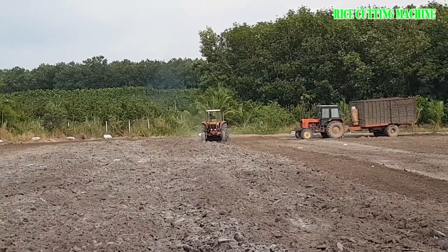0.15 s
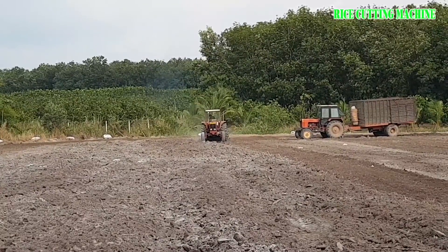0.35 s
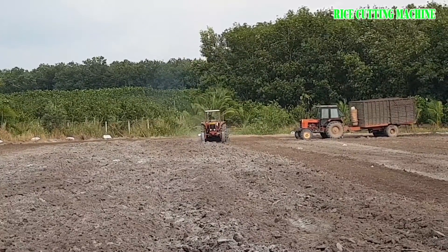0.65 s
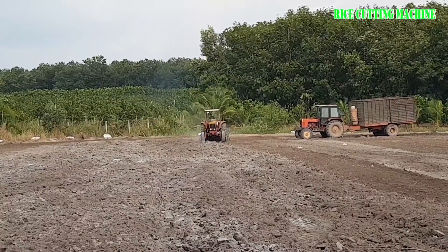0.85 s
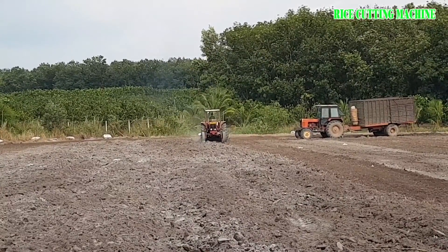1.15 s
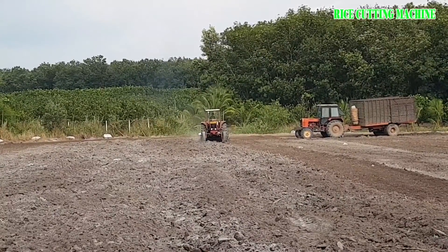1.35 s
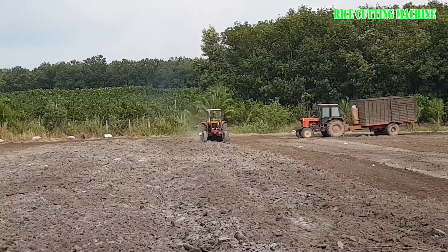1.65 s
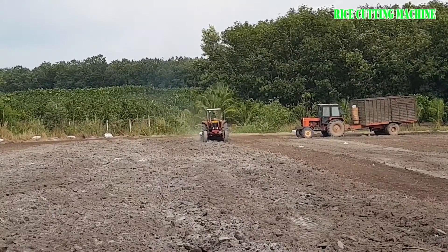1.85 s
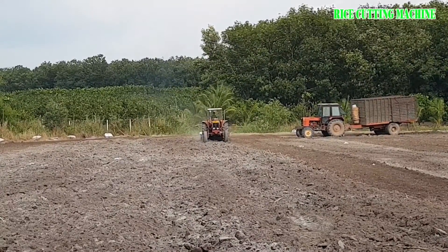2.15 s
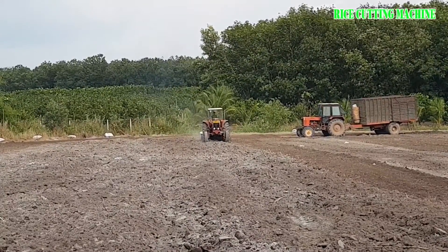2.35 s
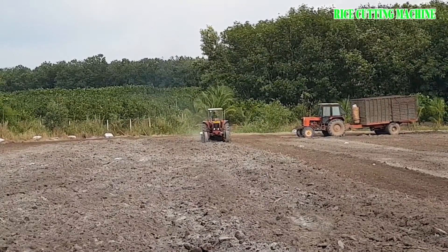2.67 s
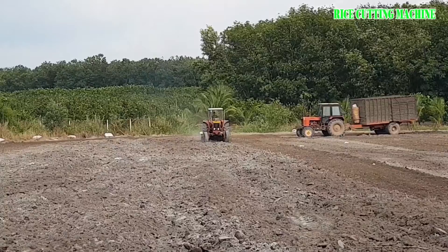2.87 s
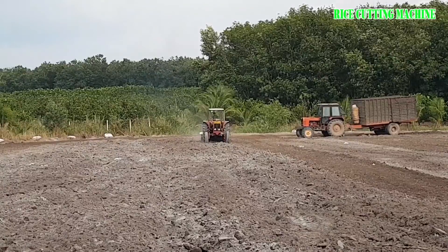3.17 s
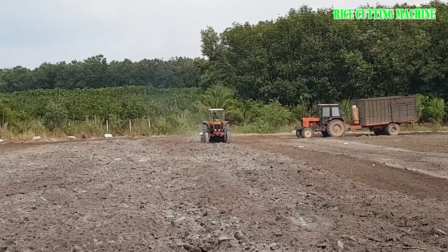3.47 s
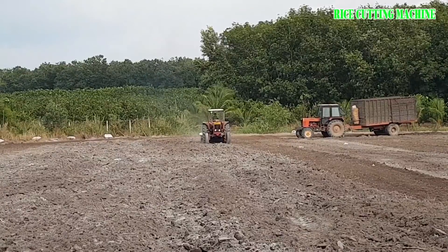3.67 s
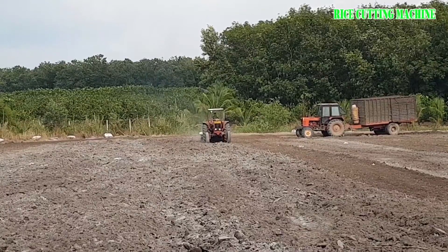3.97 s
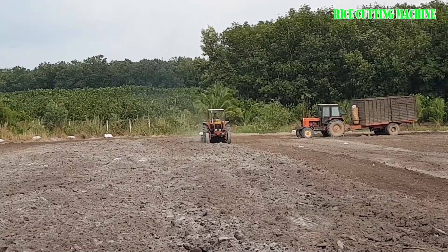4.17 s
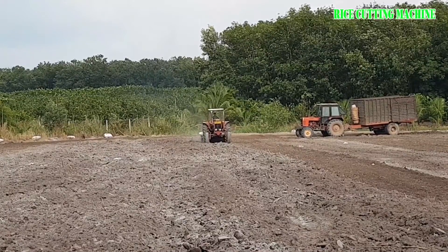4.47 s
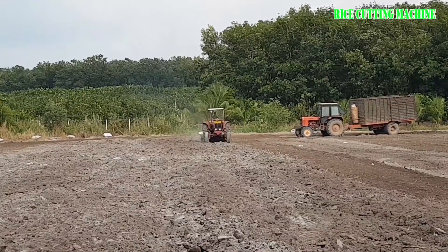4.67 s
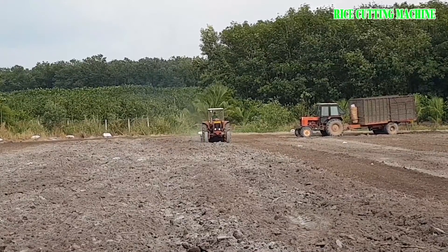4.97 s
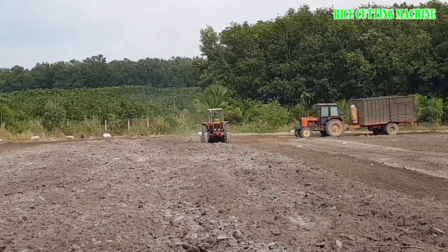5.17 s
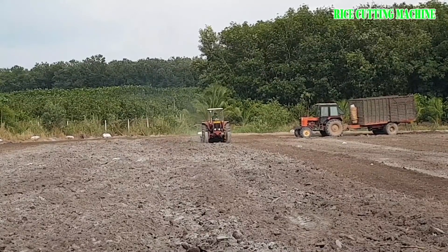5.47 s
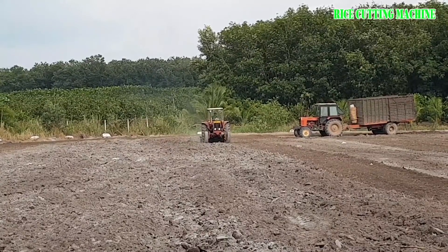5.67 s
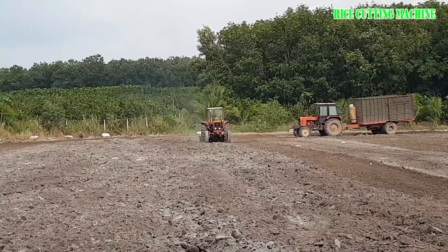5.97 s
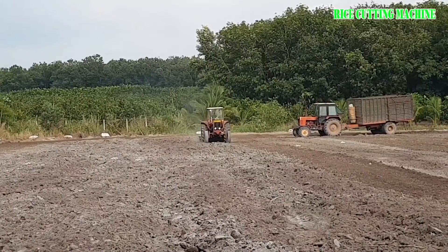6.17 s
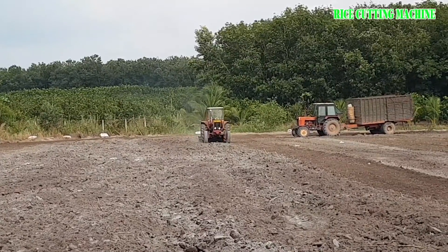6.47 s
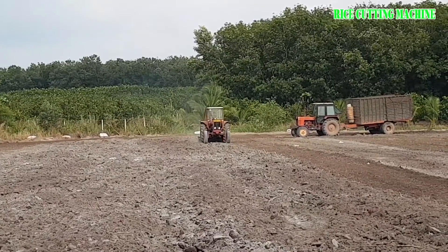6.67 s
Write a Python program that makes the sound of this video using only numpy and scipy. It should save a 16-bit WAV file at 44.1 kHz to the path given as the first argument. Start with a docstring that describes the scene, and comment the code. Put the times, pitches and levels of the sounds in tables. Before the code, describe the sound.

A tractor diesel runs throughout about seven seconds, some distance away and roughly central: a low, fast throb near 55 pulses a second with a hollow pipe-like exhaust ring and muted knocking. At first the treble is subdued; rasp and hiss rise from about 0.7, are strong near 2.4, and fade around 3 to 4. Close on the right, a dog gives short barks at about 0.05, 0.65, 1.3 and 2.1 seconds, each starting pitched and breaking into hoarse flutter, with a soft diffuse tree echo. Between 3.5 and 4.7 the engine tone beats in quickening swells. A fifth bark at 4.5 is higher, breathier and hoarse throughout. From 5 onward the engine grows fuller and raspier, continuing unbroken to the end. Faint dull air puffs and a quiet field-and-foliage wash lie underneath; the outdoor space is open.

```python
"""Tractor and barking dog

A four-cylinder diesel tractor tills a field some way off. Each firing adds a pressure pulse to the throb
and a burst of turbulence that rings in the exhaust stack; moving air lets the rasp swell and fade.
Near by on the right a dog barks five times: pitched folds, clear at first in four barks, break into
flutter and hoarse air, and the tree line scatters a soft answer. Faint noise puffs and a steady
noise wash of field and foliage lie beneath."""
import sys
import numpy as np
from scipy import signal
from scipy.fft import rfft, irfft, next_fast_len
from scipy.io import wavfile
from scipy.ndimage import uniform_filter1d, map_coordinates

SR = 44100
rng = np.random.default_rng(int(sys.argv[2]) if len(sys.argv) > 2 else 0)


def unload_audio(sound):
    """Save the sound as a 16-bit wav file, at the path given as the first command line argument."""
    columns = np.transpose(np.atleast_2d(sound))
    # keep every value between -1 and 1, then stretch to whole-number steps
    steps = np.round(np.clip(columns, -1, 1) * 32767)
    wavfile.write(sys.argv[1], SR, steps.astype(np.int16))


N = 300762

# Engine speed: (time [s], firing rate [1/s])
FIRING_RATE = [(0.0, 55.56), (0.7, 55.48), (1.2, 54.91), (1.8, 54.92), (2.25, 53.07), (2.6, 54.58),
               (2.9, 56.11), (3.2, 54.48), (3.7, 54.68), (4.2, 54.15), (4.7, 54.01), (5.2, 54.69),
               (5.6, 53.92), (6.0, 55.11), (6.4, 54.12), (6.82, 54.93)]
# Engine load, read as firing-tone strength: (time [s], relative load [dB])
ENGINE_LOAD = [(0.1, -41.5), (0.26, -38.5), (2.65, -35.5), (3.02, -38.5), (5.6, -32.5), (6.7, -33)]
USUAL_LOAD_DB = -36
# Layers driven by load: (level at usual load [dB], slope [dB per dB of load])
TONE_LAW, PIPE_LAW = (-36.5, 1.03), (-48.5, 0.65)
# Octave of the firing tone: (time [s], relative level [dB])
OCTAVE_CURVE = [(0.15, -43), (0.28, -45), (2.45, -35), (2.52, -40), (3.72, -40), (4.0, -44), (4.36, -37),
                (6.52, -37), (6.7, -36)]
# Firing-tone beating: (start [s], end [s], beat rate at start [Hz], greatest depth [0-1])
TONE_BEATING = (3.52, 4.73, 3.29, 0.67)
BEAT_SPEEDUP_HZ_PER_S = 1.2
# Rumble between the firing tones: (time [s], relative level [dB])
RUMBLE_CURVE = [(0.0, -47), (0.42, -44), (1.12, -52.5), (2.01, -39), (3.57, -42.5), (3.7, -52), (4.6, -48),
                (4.62, -43.5), (4.94, -44.5), (5.01, -35), (5.17, -40.5), (6.23, -39.5), (6.78, -40),
                (6.82, -53)]
# Rasp and sizzle as the air carries them: (time [s], relative rasp [dB], relative sizzle [dB])
AIR_CARRY = [(0.02, -59.5, -68), (0.38, -60, -69), (0.68, -51, -56.5), (0.94, -53, -51.5),
             (2.37, -43, -43.5), (2.54, -45.5, -44), (2.79, -51.5, -54), (3.07, -57, -59),
             (3.35, -60.5, -50.5), (4.05, -62.5, -56), (4.58, -48, -56.5), (4.95, -54.5, -57.5),
             (5.29, -49.5, -47.5), (5.74, -45.5, -46), (6.14, -47, -45), (6.78, -42.5, -47)]
# Finest hiss: (time [s], relative level [dB])
HISS_CURVE = [(0.02, -66.5), (0.47, -64), (1.07, -54), (1.2, -49), (1.62, -56.5), (1.9, -56.5),
              (2.11, -52.5), (2.54, -51), (2.84, -61.5), (3.13, -60), (4.56, -56.5), (4.9, -58),
              (5.48, -53), (5.71, -47), (5.95, -53), (6.16, -51), (6.42, -49.5), (6.78, -49.5)]
OCTAVE_TRIM_DB, RUMBLE_TRIM_DB = -1, 3.0
RASP_TRIM_DB, SIZZLE_TRIM_DB, HISS_TRIM_DB = 1.5, 2.5, 5.6
# Engine noise colours, low to high: (frequency [Hz], relative response [dB])
RUMBLE_COLOUR = [(25, -20), (42, -27), (55, -3.5), (78, 2.5), (100, -9), (135, -10), (180, -18.5),
                 (240, -34), (400, -34.5), (700, -50)]
PIPE_COLOUR = [(150, -19), (290, -3.5), (400, -12.5), (520, 6.5), (610, -1), (740, 5.5), (860, -12.5),
               (1020, 7.5), (1200, 5.5), (1350, 0), (1700, 0), (2100, 0), (2800, -86), (5000, -38)]
RASP_COLOUR = [(1000, -15.5), (1500, -6), (1900, -2.5), (2430, 1.5), (2680, -4.5), (2900, 1.5), (3300, -10),
               (4500, -42)]
SIZZLE_COLOUR = [(2200, -10.5), (2900, 0.5), (3350, -2), (3650, 1.5), (4200, -4.5), (5000, -10.5),
                 (7000, -32)]
HISS_COLOUR = [(2530, -15), (4300, -6.5), (4810, -14), (5450, -5.5), (6300, 1), (7090, -3.5), (8660, -5),
               (9230, -7.5), (10600, -3.5), (14200, -12), (15100, -24), (15600, -31)]
KNOCK_COLOUR = [(350, -61), (520, -6.5), (700, -7.0), (900, -44.5)]
# Reflection in the stack: (frequency [Hz], share of the nominal reflection [0-1])
STACK_REFLECTION = [(500, 0.091), (2400, 0.72), (4000, 1.0), (9000, 0.4)]
# Engine stereo balance: (frequency [Hz], left minus right [dB])
ENGINE_BALANCE = [(60, 0), (200, -1.3), (700, -0.5), (1300, -1), (2300, -0.5), (4000, -3.5), (8000, -.7),
                  (12000, -2)]
# Barks: (start [s], nominal length [s], relative level [dB], mean top pitch [Hz],
#         clear share of length [0-1], mouth brightness [dB], hoarseness [about 0-1])
BARK_LIST = [(0.049, 0.14, -19.5, 302.8, 0.32, 1, 0.63), (0.648, 0.13, -19.5, 305.7, 0.65, -0.5, 0.68),
             (1.311, 0.15, -21, 299.8, 0.22, 0.5, 0.72), (2.089, .148, -18.5, 293.5, 0.33, 0.5, 0.65),
             (4.493, 0.14, -20, 340.8, 0, 3, 1.04)]
# Dog's throat before pitch and hoarseness reshape it: (frequency [Hz], relative response [dB])
THROAT_COLOUR = [(120, -34), (270, -12), (370, -20.5), (470, 1.5), (600, 2), (720, -2.5), (840, -10.5),
                 (1010, -1), (1350, -13), (1540, -4.5), (1820, -31.5), (2900, -40), (4500, -43.5),
                 (14000, -55)]
# Open mouth: (frequency [Hz], multiplier of mouth brightness [dB/dB])
OPEN_MOUTH = [(480, -1.04), (600, 0.37), (730, 2.0), (1150, 1.2), (1650, 0.1), (2200, 0.66), (3000, 0.33)]
# Shut mouth: (frequency [Hz], response [dB])
SHUT_MOUTH = [(600, 3.5), (1100, 1.0), (2000, -23)]
JAW_SHUT_SHARE = 1.09  # of nominal bark length
# Air between dog and listener: (frequency [Hz], response [dB])
AIR_RESPONSE = [(3500, -2), (7000, -4), (14000, -14)]
# Bark pitch arch: (top position [share of length], rise, fall [shares of top pitch])
PITCH_ARCH = (.34, .2, .22)
LEAD_IN_DB, LEAD_IN_S, ATTACK_S = -13, .015, .011
SAG_DB_PER_S, RELEASE_SHARE, RELEASE_DB_PER_S = 29.5, 0.79, 335
# Tree-line echo: (frequency [Hz], time to decay 60 dB [s])
TREE_DECAY = [(200, 0.27), (550, 0.26), (1100, 0.23), (2000, 0.34), (8000, 0.03)]
# Faint dull puffs: (centre time [s], half-width to 1/e [s], level [dB],
#                    centre frequency [Hz], Gaussian width [octaves])
PUFF_LIST = [(1.1, .05, -43, 825, 0.57), (2.02, 0.035, -41, 127, 0.25), (2.42, 0.032, -36.5, 125, 0.15),
             (2.727, 0.13, -48, 293, 0.73), (5.086, 0.026, -50, 184.3, 0.27)]
# Field and foliage wash: (frequency [Hz], relative density [dB per Hz])
FIELD_COLOUR = [(150, 5.5), (400, -1), (1200, -7), (2500, -4), (5000, -3), (8000, -9), (12000, -18),
                (15500, -32)]
# Stereo: (frequency [Hz], left-right correlation)
STEREO_LIKENESS = [(60, 0.92), (130, 0.97), (290, 0.85), (640, 0.59), (1400, 0.64), (3100, 0.61),
                   (6000, 0.12), (15000, 0.2)]
TOP_HZ = 15600


def tractor():
    """Exhaust pulses give a deep throb and gas bursts, stronger under load; one cylinder in four knocks."""
    rate_hz, = curves(FIRING_RATE)
    load_db = curves(ENGINE_LOAD)[0] - USUAL_LOAD_DB
    rasp_db, sizzle_db = curves(AIR_CARRY)
    hiss_db, = curves(HISS_CURVE)
    firings = np.cumsum(rate_hz) / SR + .35
    pipe_gain = follows(PIPE_LAW, load_db)

    pipe = pipe_gain * gas(firings, PIPE_COLOUR, decay=0.29, steady=0.65, scatter_db=2.34, repeat=0.71)
    rasp = gas(firings, RASP_COLOUR, decay=0.31, steady=0.42, scatter_db=2.0, repeat=0.54)
    sizzle = gas(firings, SIZZLE_COLOUR, decay=0.31, steady=0.37, scatter_db=1.43, repeat=0.47)
    hiss = gas(firings, HISS_COLOUR, decay=0.22, steady=0.58, scatter_db=1.6, repeat=0.52)
    rasp = amp(rasp_db + RASP_TRIM_DB) * rasp
    sizzle = amp(sizzle_db + SIZZLE_TRIM_DB) * sizzle
    hiss = amp(hiss_db + HISS_TRIM_DB + 0.6 * wobble(8)) * hiss

    engine = throb(firings, load_db) + rumble() + pipe + rasp + sizzle + hiss
    engine = engine + pipe_gain * knock(firings)
    halves = np.array([[.5], [-.5]])
    return filtered(engine, lambda hz: amp(along(ENGINE_BALANCE, hz) * halves))


def throb(firings, load_db):
    """Periodic exhaust pressure: firing tone and overtones, dipping just before each valve opens."""
    octave_db, = curves(OCTAVE_CURVE)
    angle = 2 * np.pi * (firings - .915 + .012 * wobble(40))
    tone = follows(TONE_LAW, load_db) * beating() * amp(1.0 * wobble(12)) * np.cos(angle)
    overtones = np.cos(2 * angle) + 0.051 * np.cos(3 * angle)
    octave = amp(octave_db + OCTAVE_TRIM_DB) * amp(0.91 * wobble(14)) * overtones
    return -np.sqrt(2) * (tone + octave)


def beating():
    """Gain of the firing tone: it swells and dips ever faster for about a second."""
    start_s, end_s, rate_hz, depth = TONE_BEATING
    t = np.arange(N) / SR - start_s
    beats = rate_hz * t + .5 * BEAT_SPEEDUP_HZ_PER_S * t ** 2
    extent = np.sqrt(np.abs(np.sin(np.pi * np.clip(t / (end_s - start_s), 0, 1))))
    return 1 - depth * extent * np.cos(2 * np.pi * beats)


def follows(law, change_db):
    """Gain of a layer that follows a control by a (dB, dB per dB) law."""
    return amp(law[0] + law[1] * change_db)


def rumble():
    """Low random noise between the firing tones."""
    level_db, = curves(RUMBLE_CURVE)
    return amp(level_db + RUMBLE_TRIM_DB) * coloured(spread(rng.standard_normal((2, N))), RUMBLE_COLOUR)


def gas(firings, spectrum, decay, steady, scatter_db, repeat):
    """A burst of turbulence at each firing over a steady rush; part of it rings alike every time."""
    since = firings % 1  # decay is in these firing periods
    stroke = np.floor(firings).astype(int)
    cylinder_db = np.array([0, -.6, .2, .5])[stroke % 4]
    scatter = rng.standard_normal(stroke[-1] + 1)[stroke]
    size = amp(scatter_db * scatter + cylinder_db)
    burst = unit(size * (1 - np.exp(-(since / 0.13) ** 2)) * np.exp(-since / decay))
    # the same noise snippet restarts at every firing
    ring = rng.standard_normal((2, SR))[:, (since * SR / 54.6).astype(int)]
    noise = rng.standard_normal((2, N)) + repeat * ring
    rush = steady * rng.standard_normal((2, N))
    return coloured(filtered(spread(noise * burst + rush), stack), spectrum)


def stack(hz, resonance_hz=242.1, reflect=0.35):
    """Sound runs up and down the exhaust stack and leaves evenly spaced resonances."""
    kept = reflect * along(STACK_REFLECTION, hz)
    return 1 / (1 - kept * np.exp(-2j * np.pi * hz / resonance_hz))


def knock(firings):
    """One cylinder's short noise blow, once every four firings."""
    cycle = (firings + 1) % 4 - 1
    blow = np.exp(-((cycle - .14) / 0.18) ** 2) * rng.standard_normal(N)
    return amp(-10.0) * coloured(blow, KNOCK_COLOUR)


def dog():
    """Barks from the right reach the left side later and weaker."""
    pair = np.zeros((2, N + SR))
    for start_s, length_s, db, pitch_hz, clear, mouth_db, hoarse in BARK_LIST:
        call = amp(db) * bark(length_s, pitch_hz, clear, mouth_db, hoarse)
        answer = amp(-10.5) * spread(trees(call))
        start = round(start_s * SR)
        pair[:, start:start + len(call)] += call
        pair[:, start:start + answer.shape[1]] += answer
    lag_s = 17.5 / SR
    sides = np.array([[-1], [1]])  # half the lag each way
    pair = filtered(pair[:, :N], lambda hz: np.exp(1j * np.pi * hz * lag_s * sides))
    return pair * amp([[.3], [2.9]])


def bark(length_s, pitch_hz, clear, mouth_db, hoarse):
    """The vocal folds flutter irregularly once the clear share ends and let hoarse air through."""
    size = SR // 3
    t = np.arange(size) / SR
    u = t / length_s
    # hoarsest under full pressure, smoother again as the pressure falls
    rough = hoarse * np.interp(u, [clear - .06, clear + .06, .75, 1], [.3, 1, .95, .55])
    pitch = pitch_hz * arch(u) * (1 + .075 * rough * wobble(261.1, size))
    angle = 2 * np.pi * np.cumsum(pitch) / SR
    # a higher bark tightens the throat; leaking air damps its resonances
    throat = np.array(THROAT_COLOUR) * [(pitch_hz / 300) ** .35, 1.4 - 0.65 * hoarse]

    # the even partials dominate while the folds run clear
    order = np.arange(1, 25)[:, None]
    partial_gain = np.where(order % 2, amp(-6 * (1.5 - rough)), 1)
    folds = np.sum(np.cos(order * angle) * partial_gain, axis=0)
    folds = coloured(folds * amp(4.6 * rough * wobble(196, size)), throat)
    air = coloured(rng.standard_normal(size) * (1 + .5 * np.cos(angle)), throat)
    voice = (1 - .55 * rough) * folds + .8 * rough * air

    # the jaw opens and shuts once, letting the upper resonances out in mid-bark
    jaw = np.sin(np.pi * np.clip(u / JAW_SHUT_SHARE, 0, 1))
    bright = filtered(voice, lambda hz: amp(mouth_db * along(OPEN_MOUTH, hz)))
    dull = filtered(voice, lambda hz: amp(along(SHUT_MOUTH, hz)))
    voice = filtered(jaw * bright + (1 - jaw) * dull, lambda hz: amp(along(AIR_RESPONSE, hz)))
    # steady lung pressure holds the loudness even through the flutter
    voice = voice / np.sqrt(np.abs(uniform_filter1d(voice ** 2, size=700)) + 1e-9)
    return voice * effort(t, length_s)


def arch(u):
    """Pitch ratio along a bark: it rises with the lung pressure and falls with it."""
    top, rise, fall = PITCH_ARCH
    before = rise * (1 - u / top) ** 2
    after = fall * np.clip((u - top) / (1 - top), 0, 1) ** 1.595
    return 1 - np.where(u < top, before, after)


def effort(t, length_s):
    """Gain along a bark: soft lead-in, attack, sagging hold, release."""
    attack_db = LEAD_IN_DB * (1 - np.clip((t - LEAD_IN_S) / ATTACK_S, 0, 1))
    release_db = RELEASE_DB_PER_S * np.maximum(t - RELEASE_SHARE * length_s, 0)
    return amp(attack_db - SAG_DB_PER_S * t - release_db) * np.clip(t / 0.006, 0, 1)


def trees(x):
    """The tree line scatters a sound back as decaying noise, the highest treble dying first."""
    hz, t, z = signal.stft(rng.standard_normal((2, SR // 2)), SR, nperseg=256)
    decay = amp(-60 * t / along(TREE_DECAY, hz)[:, None])
    onset = 1 - np.exp(-t / 0.008)
    tail = signal.istft(z * decay * onset, SR, nperseg=256)[1]
    return signal.fftconvolve(x[None], tail / np.linalg.norm(tail[0]), axes=1)


def puffs():
    """A few faint, dull swells of band-limited noise."""
    t = np.arange(SR) / SR - .5
    out = np.zeros(N + SR)
    for centre_s, width_s, db, centre_hz, octaves in PUFF_LIST:
        def band(hz):
            return np.exp(-.5 * (np.log2((hz + 1) / centre_hz) / octaves) ** 2)
        noise = unit(filtered(rng.standard_normal(SR), band))
        out[round((centre_s - .5) * SR):][:SR] += amp(db) * noise * np.exp(-(t / width_s) ** 2)
    return out[:N]


def field():
    """A soft, even noise wash of foliage and far noise."""
    return amp(-50.5) * coloured(spread(rng.standard_normal((2, N))), FIELD_COLOUR)


def amp(db):
    """Decibels to gain."""
    return 10 ** (np.asarray(db) / 20)


def unit(x):
    """Scaled to rms 1."""
    return x / np.sqrt(np.mean(x ** 2) + 1e-20)


def along(points, hz):
    """(Hz, value) points interpolated on a log frequency axis."""
    f, v = np.transpose(points)
    return np.interp(np.log(hz + 1), np.log(f + 1), v)


def curves(rows):
    """One value per sample for each column after the time."""
    s, *cols = np.transpose(rows)
    return [np.interp(np.arange(N) / SR, s, c) for c in cols]


def wobble(rate_hz, size=N):
    """A smooth random curve, rate_hz knots a second."""
    knots = rng.standard_normal(int(size * rate_hz / SR) + 4)
    return map_coordinates(knots, [np.arange(size) * rate_hz / SR])


def filtered(x, response):
    """x times a complex response of frequency."""
    n = x.shape[-1]
    m = next_fast_len(n + 8192)
    return irfft(rfft(x, m) * response(np.fft.rfftfreq(m, 1 / SR)), m)[..., :n]


def coloured(x, spectrum):
    """x through a (Hz, dB) spectrum, at rms 1."""
    return unit(filtered(x, lambda hz: amp(along(spectrum, hz))))


def spread(pair):
    """Two unrelated signals become left and right: alike in the bass, apart in the treble."""
    def shares(hz):
        alike = np.clip(along(STEREO_LIKENESS, hz), -1, 1)
        return np.sqrt(np.array([1 + alike, 1 - alike]) / 2)
    mid, side = filtered(pair, shares)
    return np.array([mid + side, mid - side])


def scene():
    """Tractor and dog in the open field."""
    return tractor() + dog() + puffs() + field()


def record(dry):
    """Band limit: nothing at or above TOP_HZ passes."""
    return filtered(dry, lambda hz: hz < TOP_HZ)


dry = scene()
out = record(dry)
unload_audio(out)
```